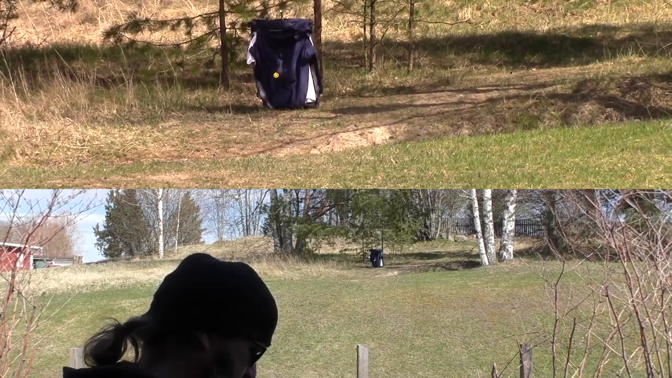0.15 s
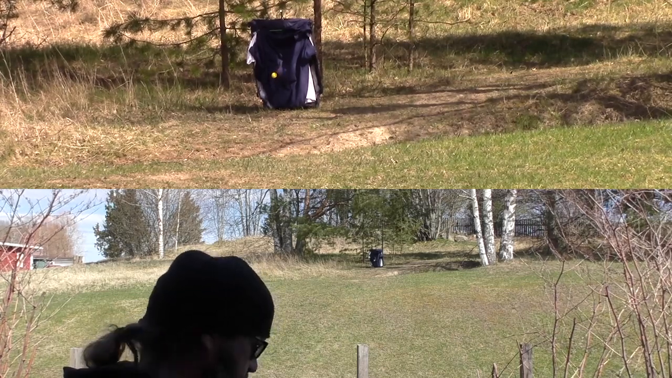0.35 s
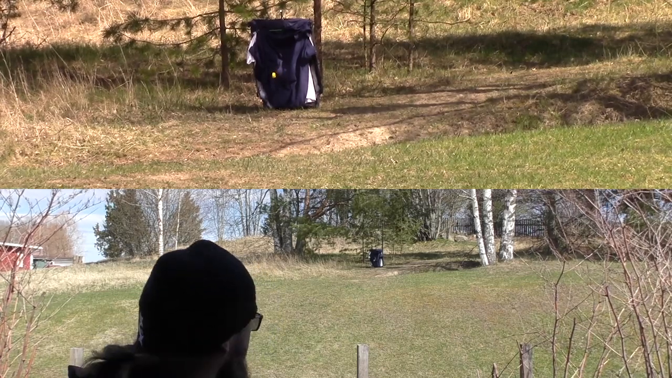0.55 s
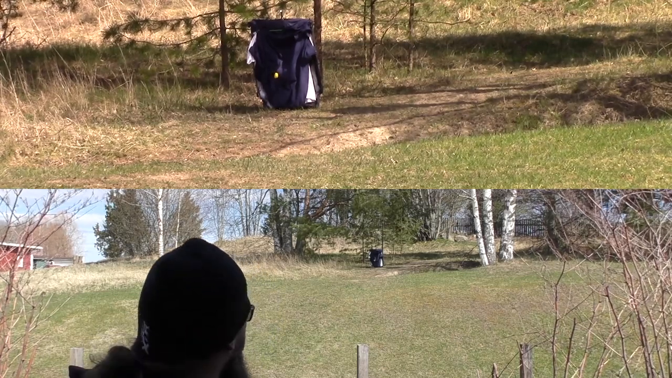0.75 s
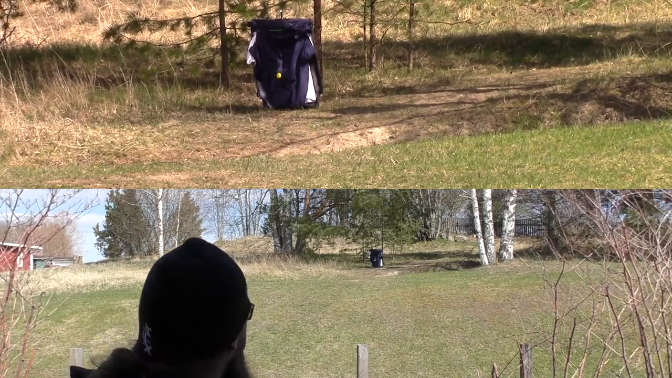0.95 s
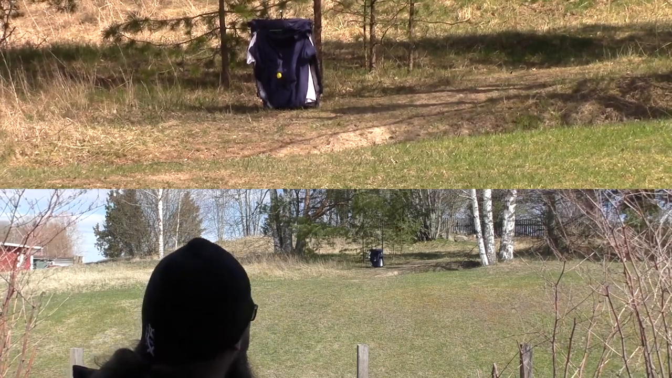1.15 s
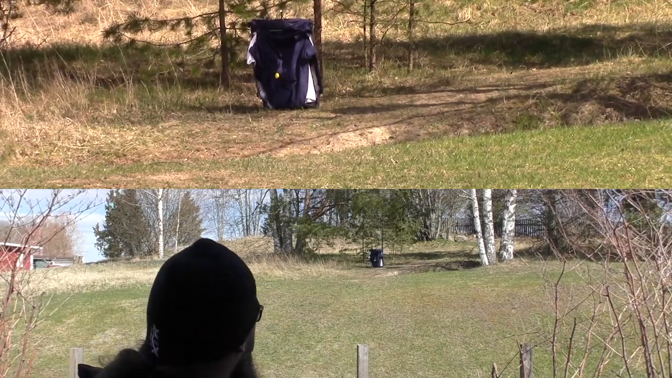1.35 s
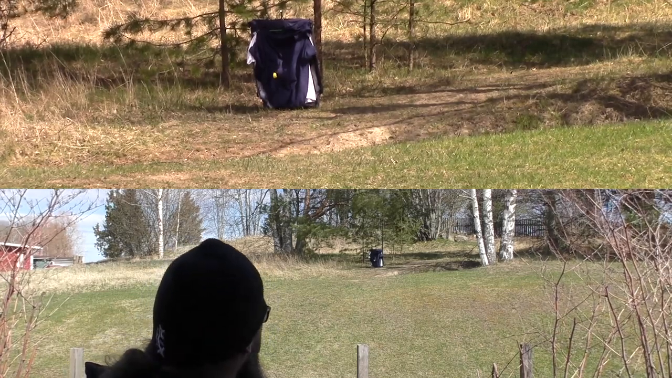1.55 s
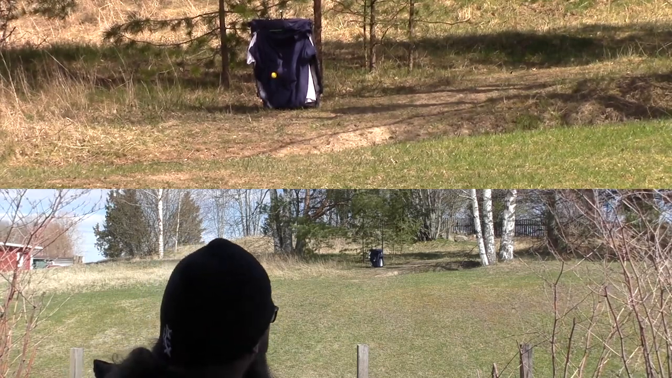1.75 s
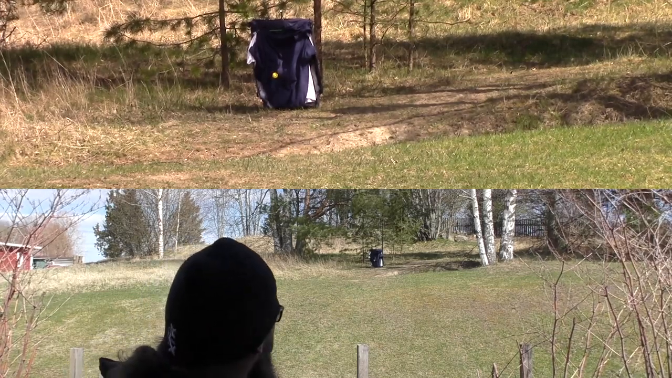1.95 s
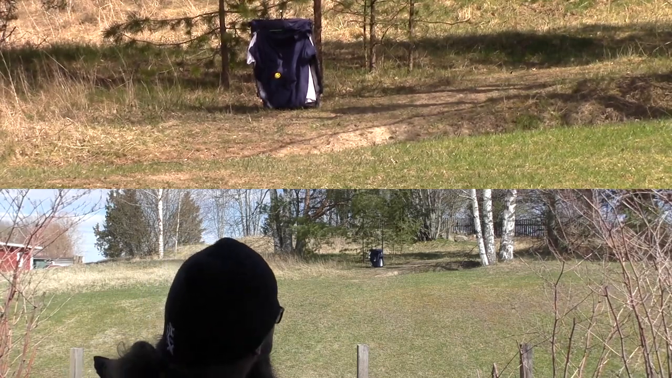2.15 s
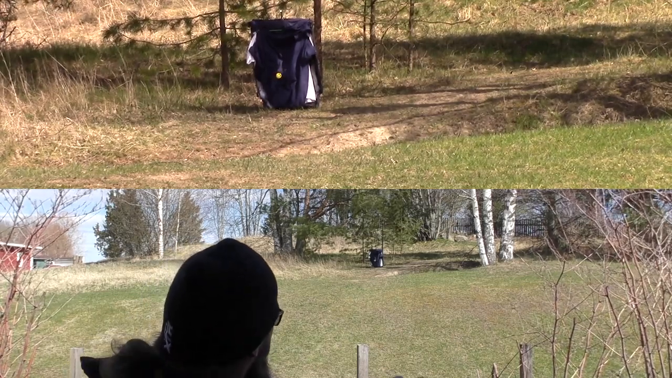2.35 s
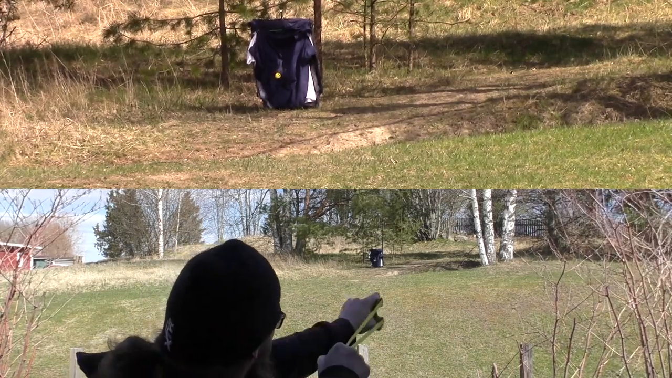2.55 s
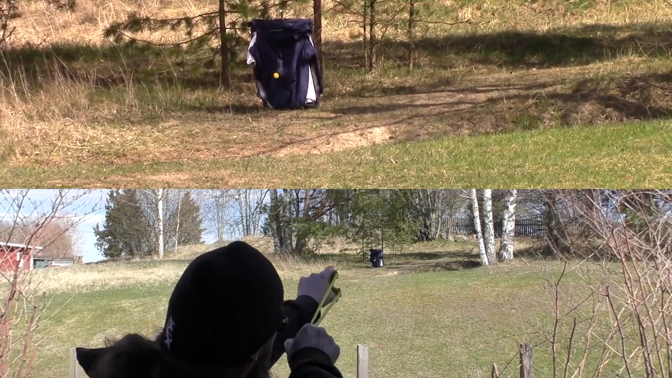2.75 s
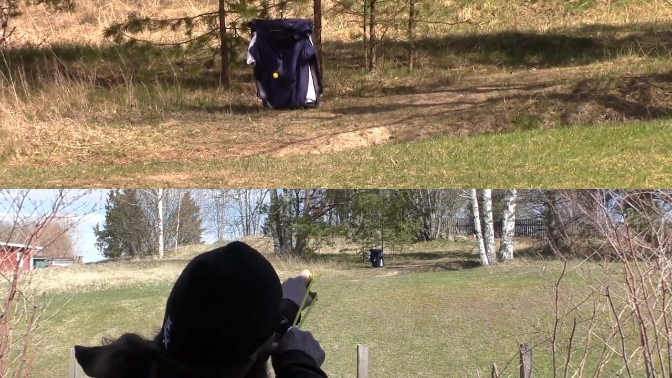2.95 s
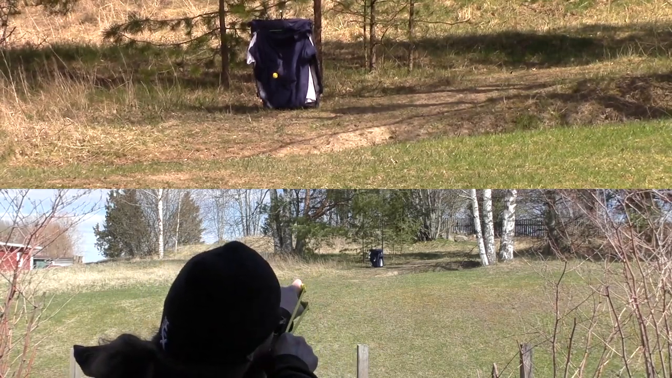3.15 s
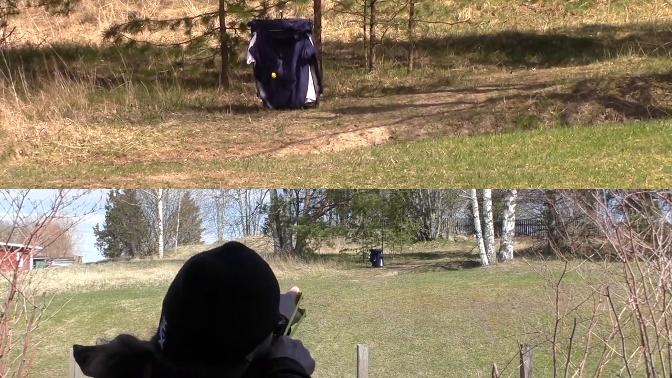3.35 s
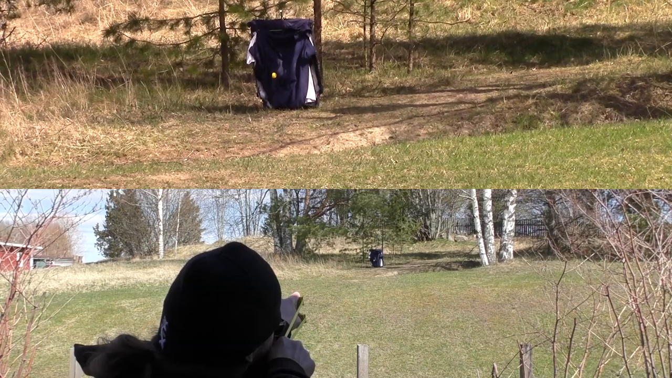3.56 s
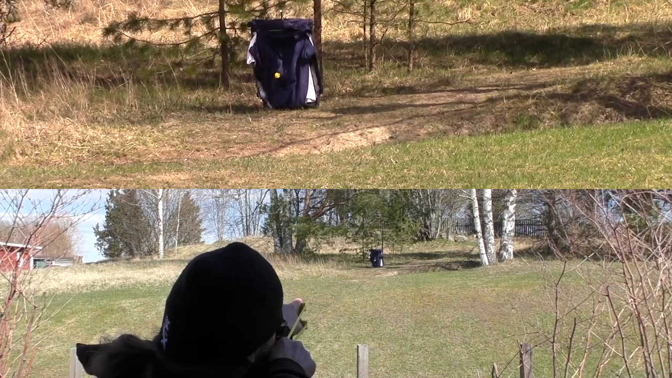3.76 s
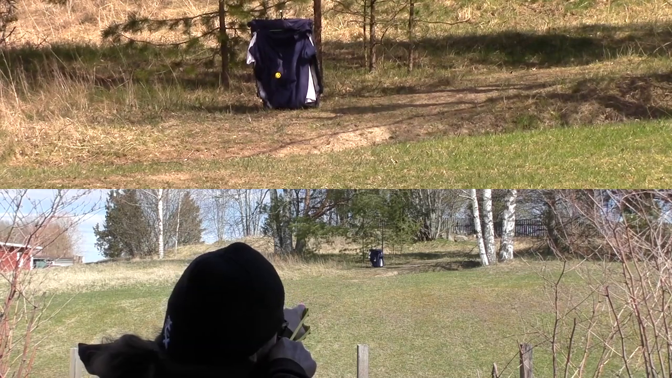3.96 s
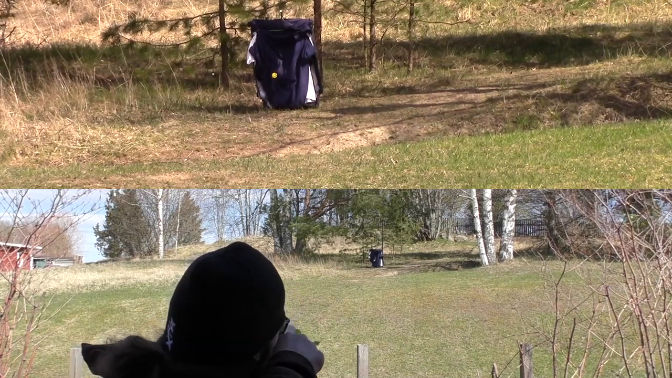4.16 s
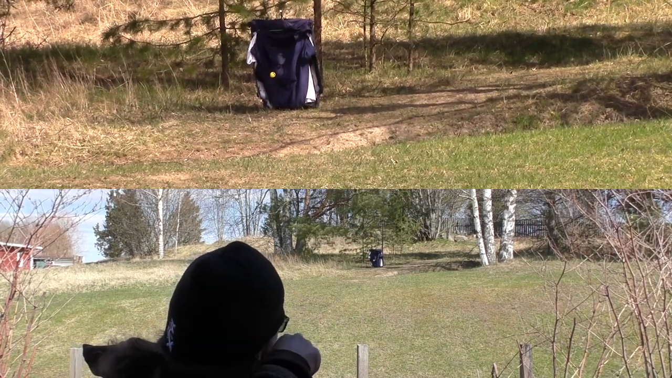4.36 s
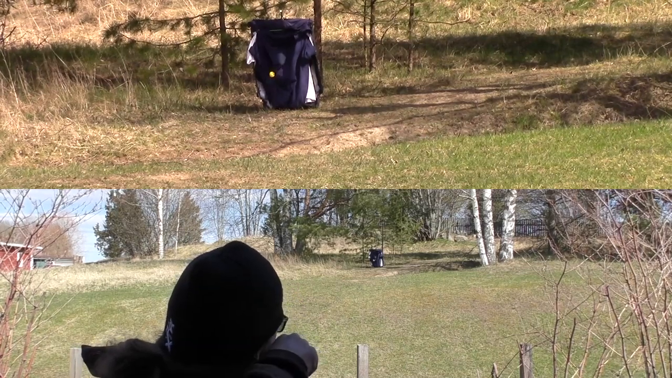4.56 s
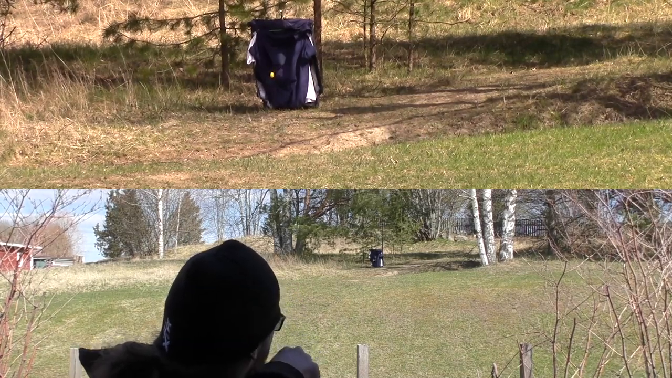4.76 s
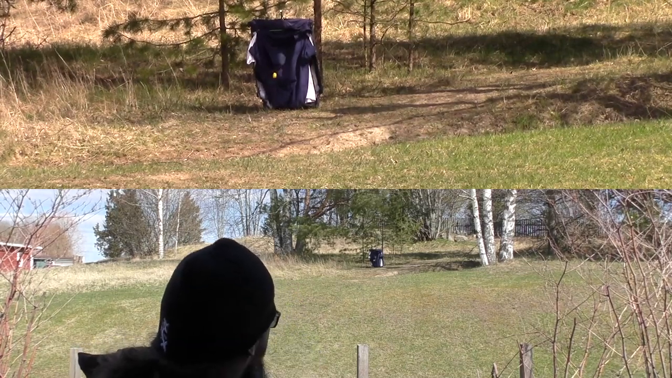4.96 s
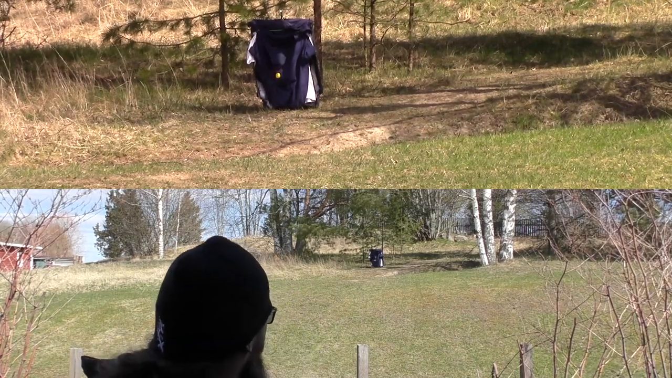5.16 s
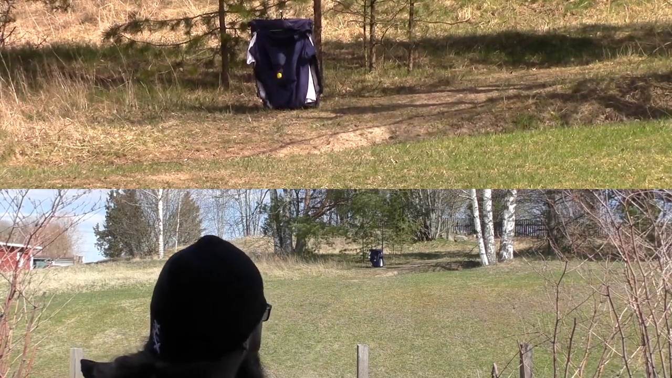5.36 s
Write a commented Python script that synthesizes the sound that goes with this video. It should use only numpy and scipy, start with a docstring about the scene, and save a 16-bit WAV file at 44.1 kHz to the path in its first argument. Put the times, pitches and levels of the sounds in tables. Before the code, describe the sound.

Light wind rumbles over a quiet field throughout, with a soft hiss of dry grass and the hum of a distant road. A far engine drones faintly, drops in pitch and fades by about 3 seconds. From the start, sleeves rustle softly and gear gives small ticks as a slingshot is raised and drawn, with one soft wind bump near 1.4 seconds. At 4.1 seconds the bands snap against the fork with a sharp, bright crack and a thump of air, by far the loudest sound, ringing briefly in a small shelter. At about 4.45 seconds a microphone at the target catches the ball punching into a hanging fabric bag with a quieter, short smack. At 4.6 seconds the same hit returns across the field as a faint click. A few small ticks of clothing and gear follow over the wind, until about 5.4 seconds.

```python
"""Sleeves rustle over light wind and distant traffic as a slingshot is raised and drawn in a small shelter.
The pouch slips free, the bands hiss and crack against the fork, and shoved air thumps between the walls.
A microphone at the target catches the ball punching into the hanging bag;
the same hit then returns faintly over the field."""
import sys
import numpy as np
from scipy import signal
from scipy.fft import rfft, irfft
from scipy.io import wavfile
from scipy.ndimage import uniform_filter1d, map_coordinates

SR = 44100
rng = np.random.default_rng(int(sys.argv[2]) if len(sys.argv) > 2 else 0)


def unload_wav(signal):
    """Save mono or channel-first audio to the path in sys.argv[1] as 16-bit WAV at rate SR, clipped to [-1, 1]."""
    wavfile.write(
        sys.argv[1],
        SR,
        np.round(np.clip(np.atleast_2d(signal).T, -1, 1) * 32767).astype(np.int16),
    )


N = 238400

# noise spectra: (frequency [Hz], relative density [dB])
RUMBLE_SPECTRUM = [(20, -32), (35, -8), (60, -1.5), (110, 0.5), (180, -5), (240, -4), (320, -10.5),
                   (600, -53.5)]
WIND_SPECTRUM = [(120, -23), (220, -4), (310, 0.5), (480, -1.5), (560, -13), (800, -22.5), (1500, -46)]
TYRE_SPECTRUM = [(300, -10.5), (600, -9.5), (870, -7.5), (1010, -1.5), (1090, 2.5), (1200, -1.5),
                 (1700, -7.5), (2600, -15.5), (5000, -40)]
GRASS_SPECTRUM = [(500, -0.5), (2000, 2), (3500, 0.5), (6000, -8), (11000, -7), (15500, -9.5)]
RUB_SPECTRUM = [(900, -8), (2000, 1.5), (3300, 3), (4800, -2.5), (7000, -7), (12000, -58)]
FIZZ_SPECTRUM = [(4000, -8), (7500, -0.5), (11500, -1.5), (15500, -9)]
RETURN_SPECTRUM = [(400, -12), (1500, -3.5), (2150, 4), (3000, -4.5), (4600, -8), (6000, -14), (8000, -11),
                   (12000, -11.5), (15500, -22)]
BAG_SPECTRUM = [(60, -4), (260, 15), (500, -5), (800, 1.5), (1200, -9), (3300, 1), (6000, -9.5),
                (9000, -24), (15500, -30)]
SHELTER_SPECTRUM = [(40, -24), (85, 6.5), (130, -29), (220, 9.5), (480, 1), (620, -16), (880, -11.5),
                    (1050, 1.5), (2100, -0.5), (3000, -3), (5000, -4), (8000, -1), (11500, -0.5),
                    (15500, -5)]
# left-right likeness: (frequency [Hz], coherence [0-1])
AMBIENT_COHERENCE = [(60, 0.82), (290, 0.9), (640, 0.93), (1410, 0.65), (3100, 0.35), (6820, 0.94),
                     (15000, 0.4)]
RUMBLE_COHERENCE = [(40, 0.54), (150, 0.78)]
CRACK_COHERENCE = [(5000, 0.98), (9000, 0.85), (12000, 0.55)]
# wind swells: (centre [s], half length [s], lift [dB])
WIND_GUSTS = [(1.03, 0.25, 4), (1.9, 0.14, 1.5), (3.6, 0.18, 2.7), (5.25, .2, 2)]
# far engine easing off: (time [s], pitch [Hz], relative level [dB])
ENGINE_TRACK = [(0, 178, -57.5), (.8, 163.4, -50), (1.6, 158, -52), (2.0, 124.4, -51.5),
                (2.8, 122.4, -58.5), (5.4, 120.4, -72)]
# arm movements: (centre [s], half length [s], rub [dB], fizz re rub [dB])
ARM_STROKES = [(0.076, .07, -59.5, -7), (0.272, 0.063, -61.5, 4), (1.22, 0.25, -55, -3.5),
               (1.515, 0.17, -53, -2.5), (1.956, 0.21, -59.5, -4), (2.337, 0.16, -58, -4),
               (3.003, 0.073, -52.5, -6.5), (3.215, 0.088, -53.5, -5.5), (3.495, 0.04, -51.5, -4),
               (3.65, .26, -55.5, -4)]
# cloth and gear: (time [s], relative level [dB], rub re fizz [dB], ring [Hz], ring re fizz [dB])
GEAR_CATCHES = [(0.45, -35, -1.5, 4040, -1), (.652, -47, 4, 3200, 7), (1.655, -44.5, 3, 6460, -2),
                (1.909, -46, 10.5, 2010, 4), (2.292, -39.5, -9, 8440, -8), (2.418, -37, -6, 8750, -6),
                (2.843, -43, -5, 8300, -10), (2.965, -37.5, -9, 2740, -2), (3.186, -42.5, 6, 4800, 1),
                (4.702, -43.5, 5, 6500, -2), (5.216, -40, -6, 3980, -6), (5.249, -50, 10, 2620, 8)]
# bag front and back: (time [s], relative crack [dB], crack [Hz], tear [dB], thud [dB], thud [Hz])
BAG_HITS = [(4.4406, -17, 3050, -36.5, -23.5, 237), (4.4442, -20.5, 3860, -43, -25, 278)]
# shelter decay: (frequency [Hz], t60 [s])
SHELTER_T60 = [(100, 0.11), (300, 0.13), (800, 0.13), (2000, 0.16), (5000, 0.18), (9000, 0.16),
               (15000, 0.13)]
# wall reflections: (delay [s], gain [dB], left-ear lead [s])
WALL_ECHOES = [(.0046, -5, -.0005), (0.011, -17, .0004), (0.0149, -5, -.0002), (0.0186, -4.5, .0004),
               (.0255, -32, -.0005), (0.0376, -17, .0004)]
# fork and slack bands: (frequency [Hz], level [dB], t60 [s])
FORK_MODES = [(281, -32, 0.32), (402.5, -23, 0.16), (829, -27.5, 0.12), (1420, -30, 0.12),
              (1691, -26, 0.18), (1983, -33, .2), (2030, -38, 0.47), (2130, -36.5, 0.4),
              (2224, -22.5, 0.15), (3700, -24, 0.17), (4860, -23, 0.12), (6130, -31, 0.11),
              (8200, -37, .13)]
# bands and pouch striking: (time [s], level [dB], rise [s], centre [Hz], width [octaves])
BAND_SLAPS = [(4.1109, -9.5, 0.00047, 2000, 1.5), (4.1118, -3, 0.00082, 11700, 0.25),
              (4.1162, -11, 0.0014, 12400, 0.37), (4.119, -8, 0.00064, 2940, 1.1),
              (4.119, -10, 0.00061, 7400, .2), (4.1358, -15, .0006, 8760, .25)]

RELEASE_S, SNAP_S = 4.1003, 4.1112  # pouch leaves the fingers; bands reach the fork


def amp(db):
    """Decibels to gain."""
    return 10 ** (np.asarray(db) / 20)


def unit(x):
    """Scale to rms 1."""
    return x / np.sqrt(np.mean(x ** 2) + 1e-20)


def along(points, hz):
    """Interpolate (Hz, value) points on a log axis."""
    knots_hz, values = np.transpose(points)
    return np.interp(np.log(hz + 1), np.log(knots_hz + 1), values)


def since(s):
    """Seconds since s per sample, negative before it."""
    return np.arange(N) / SR - s


def add(track, s, sound):
    """Mix a sound into the track at time s."""
    part = track[..., round(s * SR):][..., :sound.shape[-1]]
    part += sound[..., :part.shape[-1]]


def fade(t, rise_s, t60_s):
    """Rise from t = 0, then exponential decay."""
    t = np.maximum(t, 0)
    return (1 - np.exp(-t / rise_s)) * np.exp(-np.log(1000) * t / t60_s)


def swell(s, half_s):
    """Gaussian envelope around time s."""
    return np.exp(-(since(s) / half_s) ** 2)


def wobble(rate_hz, size=N):
    """Smooth random curve with knots at rate_hz."""
    knots = rng.standard_normal(int(size * rate_hz / SR) + 4)
    return map_coordinates(knots, [np.arange(size) * rate_hz / SR])


def noise(gain, size=N, coherence=AMBIENT_COHERENCE):
    """Stereo noise, rms 1, coloured by gain(hz)."""
    hz = np.fft.rfftfreq(size, 1 / SR)
    angle = np.arccos(along(coherence, hz)) / 2
    white = rfft(rng.standard_normal((2, size)))
    mid, side = irfft(white * gain(hz) * [np.cos(angle), np.sin(angle)], size)
    return unit(np.array([mid + side, mid - side]))


def rush(spectrum, size=N, coherence=AMBIENT_COHERENCE):
    """Noise shaped by a spectrum table."""
    return noise(lambda hz: amp(along(spectrum, hz)), size, coherence)


def band(centre_hz, width_oct, size=N, coherence=AMBIENT_COHERENCE):
    """Noise in a bell-shaped band."""
    return noise(lambda hz: np.exp(-.5 * (np.log2((hz + 1) / centre_hz) / width_oct) ** 2),
                 size, coherence)


def patchy(x, depth_db):
    """Flickering colour: random gain over frequency and time, rms 1 out."""
    bins = signal.stft(x, nperseg=512)[2]
    field = uniform_filter1d(rng.standard_normal(bins.shape[1:]), size=3, axis=0)
    field = uniform_filter1d(field, size=4, axis=1)
    gain = amp(depth_db * np.tanh(unit(field)))
    return unit(signal.istft(bins * gain, nperseg=512)[1][:, :N])


def outdoors():
    """Wind rumbles, gusts and bumps once; tyres hum on a far road; dry grass hisses."""
    rumble_db = -56 - 0.5 * since(N / SR / 2) + 1.4 * wobble(7.3)
    rumble = amp(rumble_db) * rush(RUMBLE_SPECTRUM, coherence=RUMBLE_COHERENCE)
    gust_db = sum(db * swell(s, half_s) for s, half_s, db in WIND_GUSTS)
    wind = amp(-56.5 + gust_db + wobble(7)) * rush(WIND_SPECTRUM)
    bump = amp(-42) * fade(since(1.4), rise_s=0.0077, t60_s=0.18) * band(70, width_oct=0.73)
    passing_db = 2 * swell(1.96, half_s=0.38)
    road = amp(-54.5 + passing_db + 0.26 * wobble(6.5)) * rush(TYRE_SPECTRUM)
    grass = amp(-56) * patchy(rush(GRASS_SPECTRUM), depth_db=1.5)
    return rumble + wind + bump + road + grass


def engine():
    """A far engine drones; the air path blurs its note into a narrow rumble."""
    times_s, *columns = np.transpose(ENGINE_TRACK)
    pitch_hz, db = [np.interp(since(0), times_s, column) for column in columns]
    phase = 2 * np.pi * np.cumsum(pitch_hz) / SR
    blur_hz = 85
    return amp(db - 5.5) * unit(wobble(blur_hz) * np.sin(phase) + wobble(blur_hz) * np.cos(phase))


def sleeves():
    """Cloth grips and slides unevenly with each arm movement, stirring faintly in between."""
    rub_power, fizz_power = amp(-60) ** 2, amp(-65) ** 2
    for s, half_s, db, fizz_db in ARM_STROKES:
        stroke = amp(db) * swell(s, half_s)
        rub_power += stroke ** 2
        fizz_power += (amp(fizz_db) * stroke) ** 2
    rub = np.sqrt(rub_power) * patchy(rush(RUB_SPECTRUM), depth_db=6)
    fizz = np.sqrt(fizz_power) * patchy(rush(FIZZ_SPECTRUM), depth_db=5)
    grip_db = 1.8 * wobble(70) + 1.1 * wobble(20)
    return amp(grip_db) * (rub + fizz)


def catches():
    """Cloth and gear catch and tick; faint creases give way before the release."""
    out, t = np.zeros((2, N)), np.arange(SR // 4) / SR
    envelope = fade(t, rise_s=0.0011, t60_s=0.15)
    for s, db, rub_db, ring_hz, ring_db in GEAR_CATCHES:
        scrape = rush(FIZZ_SPECTRUM, len(t)) + amp(rub_db) * rush(RUB_SPECTRUM, len(t))
        ring = amp(ring_db) * band(ring_hz, width_oct=0.04, size=len(t))
        add(out, s, amp(db - 11.5) * envelope * (scrape + ring))
    for when, strength in rng.random(size=(12, 2)):
        crease = rush(FIZZ_SPECTRUM, len(t)) + amp(-10) * rush(RUB_SPECTRUM, len(t))
        add(out, when * RELEASE_S, amp(-63 + 6 * strength) * envelope * crease)
    return out


def far_hit():
    """The hit returns over the field and rings briefly in the shelter."""
    out, t = np.zeros((2, N)), np.arange(SR // 4) / SR
    tick = amp(-41) * fade(t, rise_s=0.0003, t60_s=0.03) * band(2100, width_oct=0.1, size=len(t))
    ring = amp(-50.5) * fade(t, rise_s=0.0023, t60_s=0.18) * band(4550, width_oct=0.047, size=len(t))
    attack = amp(-40) * fade(t, rise_s=0.0005, t60_s=0.017)
    tail = amp(-39.5) * fade(t, rise_s=0.003, t60_s=0.14)
    add(out, 4.595, tick + ring + (attack + tail) * rush(RETURN_SPECTRUM, len(t)))
    return out


def bag():
    """The ball cracks through two taut fabric layers; each tears and thuds, the bag shivers and booms."""
    out, t = np.zeros((2, N)), np.arange(SR // 4) / SR
    lead_s = 0.005  # room for the pulse's leading half
    age_s = t - lead_s
    for s, crack_db, crack_hz, tear_db, thud_db, thud_hz in BAG_HITS:
        u = np.pi * crack_hz * age_s
        crack = amp(crack_db + 2) * (1 - 2 * u * u) * np.exp(-u * u)
        tear = amp(tear_db) * np.exp(-np.abs(age_s) / 0.00091) * rush(FIZZ_SPECTRUM, len(t))
        thud = fade(age_s, rise_s=0.00018, t60_s=0.0077) * np.cos(2 * np.pi * thud_hz * age_s)
        add(out, s - lead_s, crack + tear + amp(thud_db) * thud)
    flap = amp(-29) * fade(t, rise_s=0.00018, t60_s=0.012)
    shiver = amp(-39.5) * fade(t, rise_s=0.002, t60_s=0.21)
    boom_hz = 275
    boom_phase = 2 * np.pi * boom_hz * t + 0.5 * wobble(60, len(t))
    boom = amp(-46) * fade(t, rise_s=0.0024, t60_s=0.18) * np.cos(boom_phase)
    add(out, BAG_HITS[-1][0], (flap + shiver) * rush(BAG_SPECTRUM, len(t)) + boom)
    return out


def shelter():
    """The crack scatters round the shelter in clumps of reflections; trees answer faintly."""
    out, onset_s = np.zeros((2, N)), 4.1115
    hz, t, bins = signal.stft(rush(SHELTER_SPECTRUM, SR // 2), SR, nperseg=256)
    decay = np.exp(-np.log(1000) * t / along(SHELTER_T60, hz)[:, None])
    add(out, onset_s, signal.istft(bins * decay, SR, nperseg=256)[1])
    build_up = 1 - np.exp(-np.maximum(since(onset_s), 0) / 0.0088)
    clumps = amp(1.2 * wobble(350))
    trees = amp(-42.5) * fade(since(4.16), rise_s=0.03, t60_s=0.84) * rush(RETURN_SPECTRUM)
    return amp(-5.5) * clumps * build_up * out + trees


def fork():
    """Fork and bands ring on, wavering as the rubber goes slack."""
    out, t = np.zeros((2, N)), np.arange(SR // 2) / SR
    for hz, db, t60_s in FORK_MODES:
        waver = np.array([wobble(45, len(t)), wobble(47.04, len(t))])
        tone = np.sin(2 * np.pi * hz * t + 0.5 * waver)
        add(out, 4.117, amp(db) * fade(t, rise_s=0.0025, t60_s=t60_s) * tone)
    return out


def air_pulse(s, hz):
    """Briefly shoved air: suction, then a push."""
    u = 2 * np.pi * hz * since(s)
    return u * np.exp((1 - u * u) / 2)


def thump():
    """The flying pouch shoves the air; the long wave bounces whole between the walls."""
    s, pitch_hz = 4.1146, 265
    echoes = np.zeros((2, N))
    for delay_s, db, lead_s in WALL_ECHOES:
        echoes[0] += amp(db) * air_pulse(s + delay_s - lead_s / 2, pitch_hz)
        echoes[1] += amp(db) * air_pulse(s + delay_s + lead_s / 2, pitch_hz)
    return amp(-11.5) * (air_pulse(s, pitch_hz) + echoes)


def release():
    """The pouch flicks from the fingers; the bands hiss louder as they gather speed."""
    t = since(RELEASE_S)
    flick = amp(-21.5) * fade(t, rise_s=0.00095, t60_s=0.02) * band(1600, width_oct=0.54)
    puff = amp(-30) * fade(t, rise_s=0.0012, t60_s=0.028) * band(330, width_oct=0.45)
    in_flight = (t > 0) * (since(SNAP_S) < 0)
    growth_db_per_s = 1900
    whoosh_db = -21.5 + growth_db_per_s * np.minimum(since(SNAP_S), 0)
    whoosh = in_flight * amp(whoosh_db) * band(9000, width_oct=2)
    return flick + puff + whoosh


def cracks():
    """The rubber slaps itself and the fork in very short cracks, then flutters out."""
    out, t = np.zeros((2, N)), np.arange(SR // 20) / SR
    for s, db, rise_s, centre_hz, width_oct in BAND_SLAPS:
        burst = (t / rise_s * np.exp(1 - t / rise_s)) ** 2
        add(out, s, amp(db) * burst * band(centre_hz, width_oct, len(t), CRACK_COHERENCE))
    flutter = amp(-16 + 2 * wobble(500)) * fade(since(SNAP_S), rise_s=0.0018, t60_s=0.08)
    return out + flutter * band(14000, width_oct=0.9, coherence=CRACK_COHERENCE)


def scene():
    """The shot and its hit over the quiet field."""
    shot = release() + cracks() + thump() + fork() + shelter()
    return outdoors() + engine() + sleeves() + catches() + shot + bag() + far_hit()


def record(dry):
    """Peak clipping, then a steep low-pass."""
    cutoff_hz, edge_hz = 15850, 200
    clipped = np.clip(dry, -1, 1)
    hz = np.fft.rfftfreq(2 * N, 1 / SR)
    low_pass = np.clip((cutoff_hz - hz) / edge_hz + 0.5, 0, 1)
    return irfft(rfft(clipped, 2 * N) * low_pass)[:, :N]


dry = scene()
out = record(dry)
unload_wav(out)
```